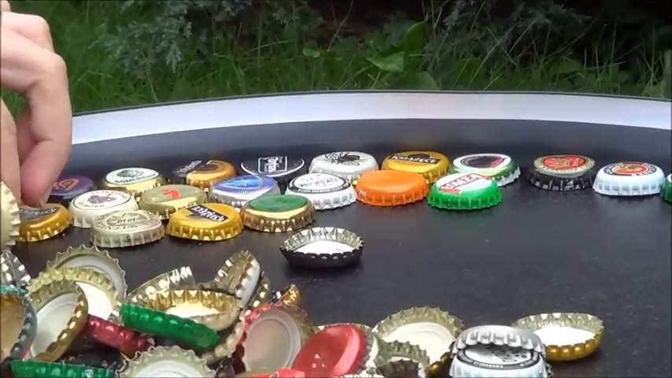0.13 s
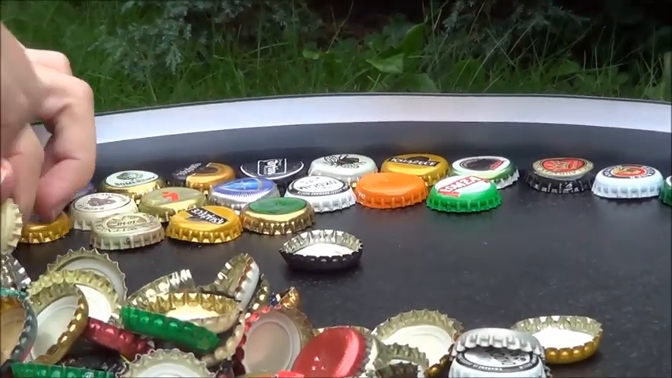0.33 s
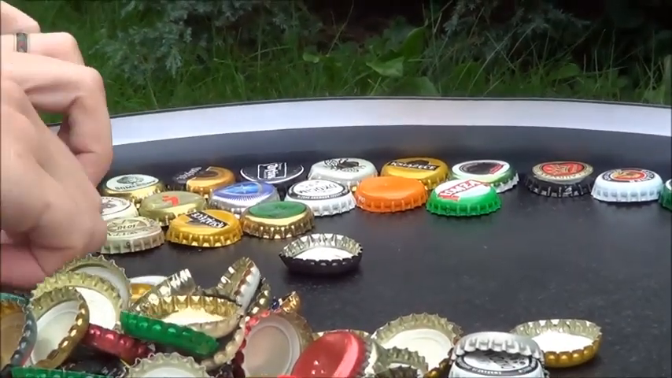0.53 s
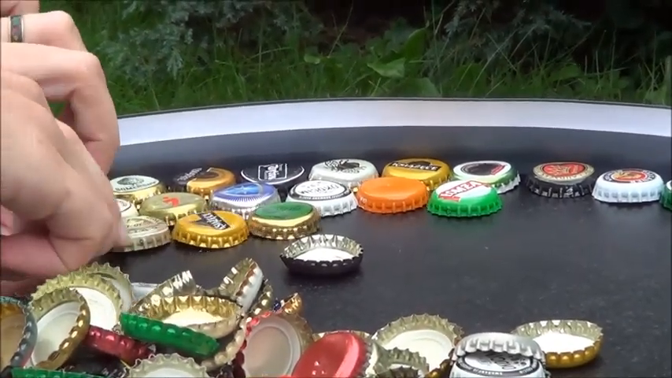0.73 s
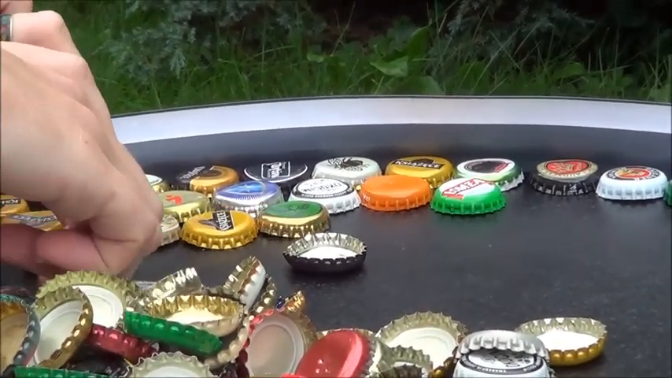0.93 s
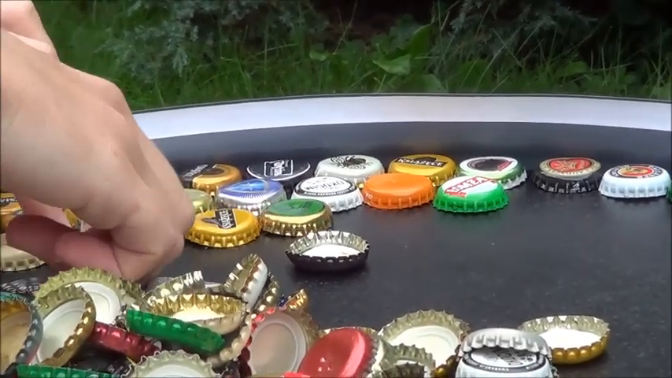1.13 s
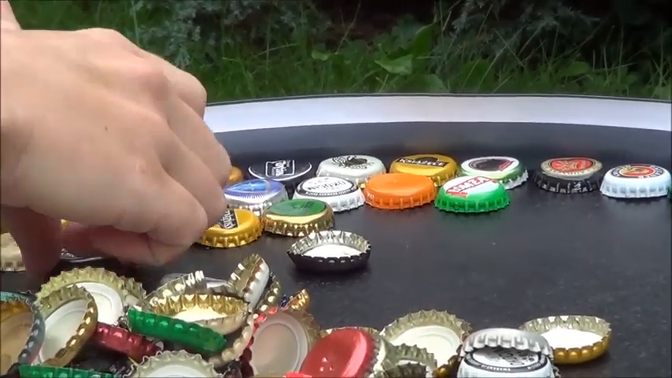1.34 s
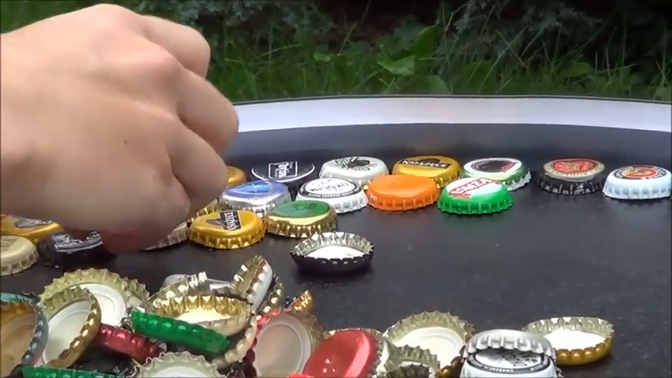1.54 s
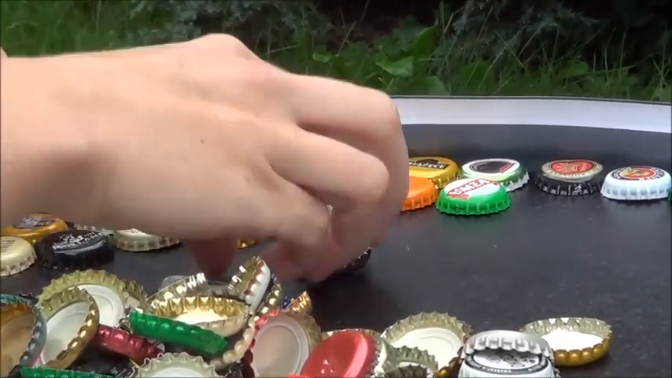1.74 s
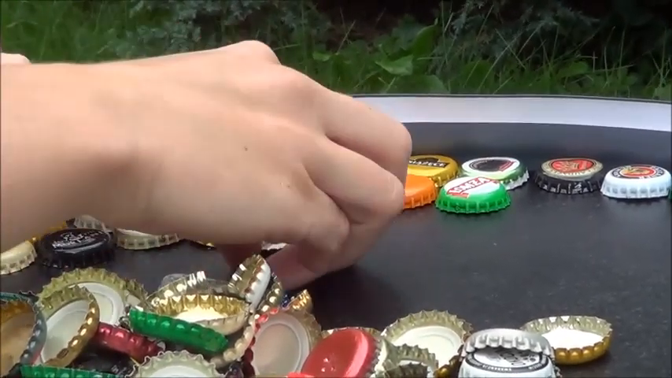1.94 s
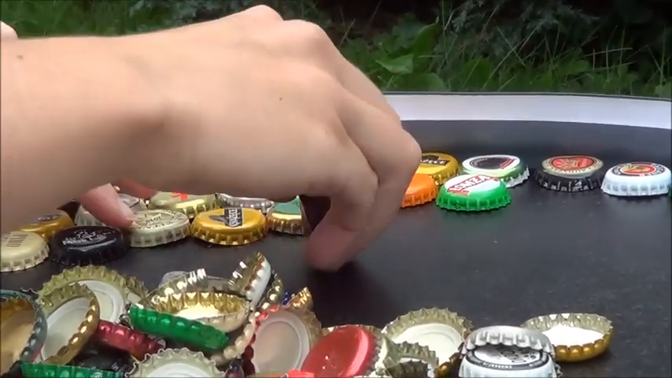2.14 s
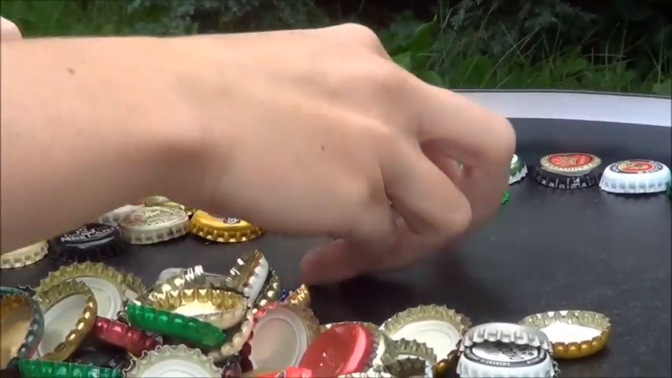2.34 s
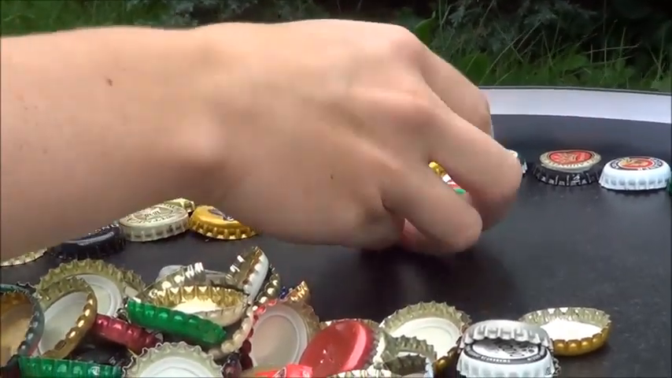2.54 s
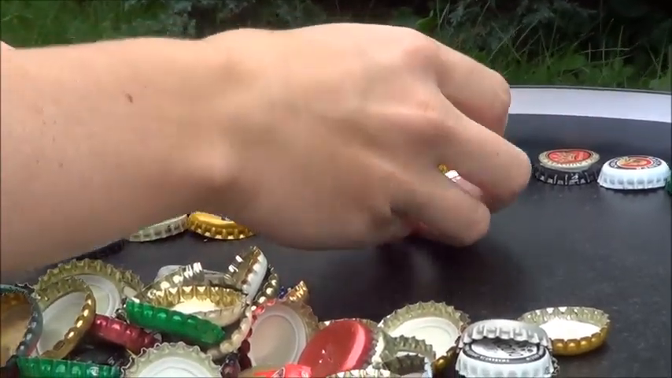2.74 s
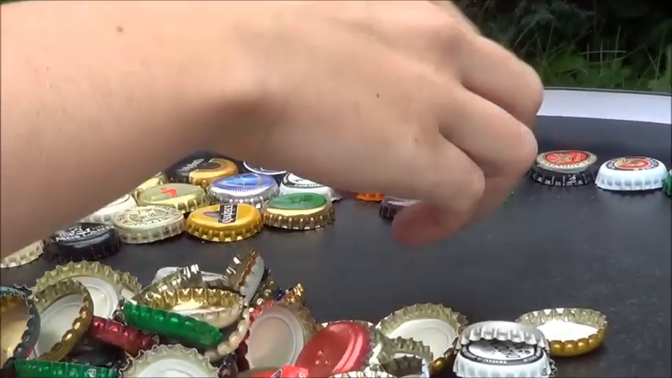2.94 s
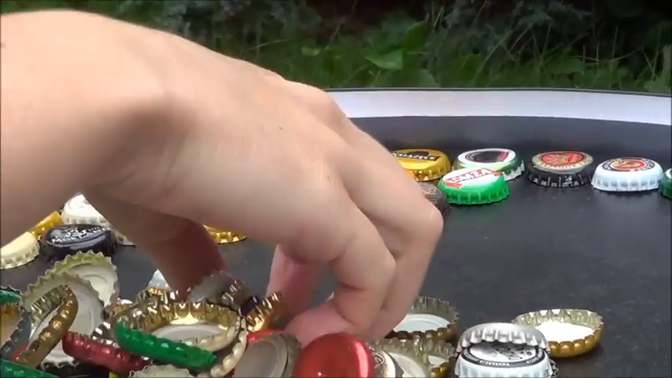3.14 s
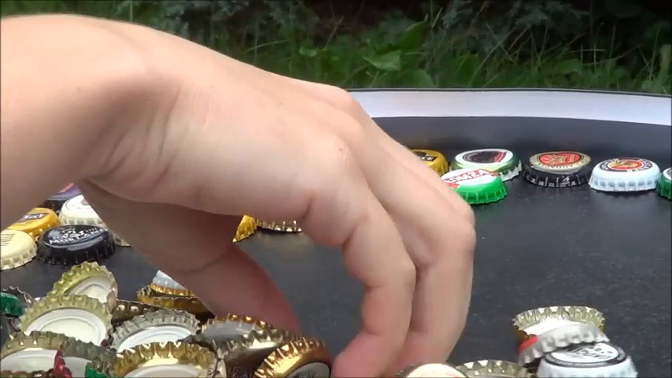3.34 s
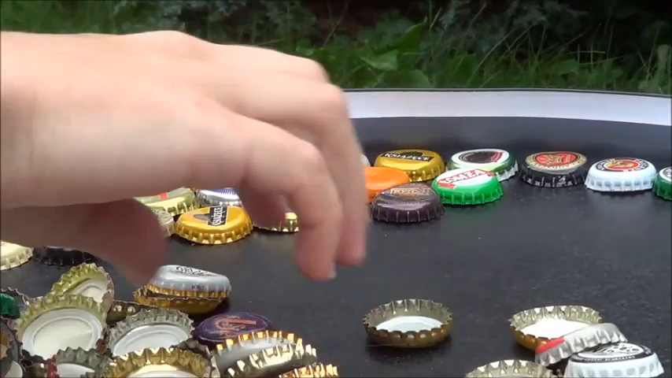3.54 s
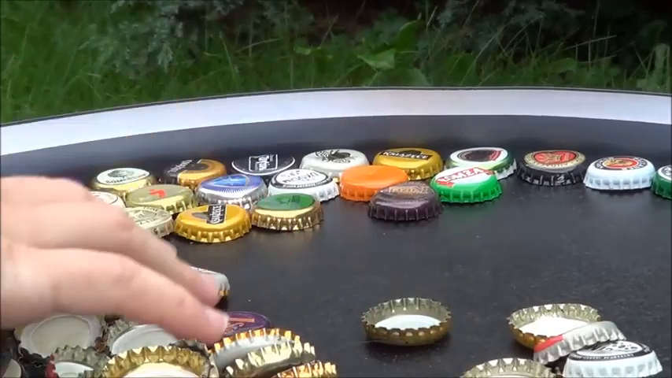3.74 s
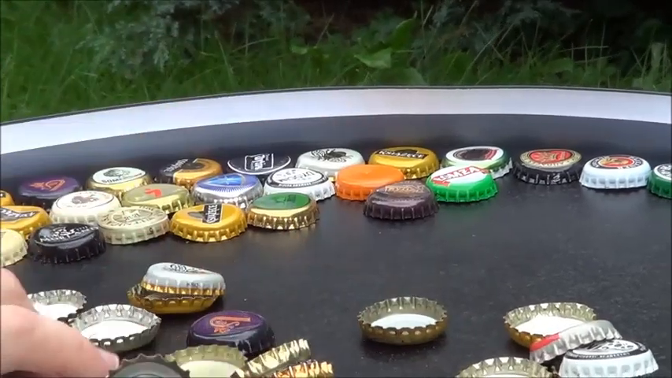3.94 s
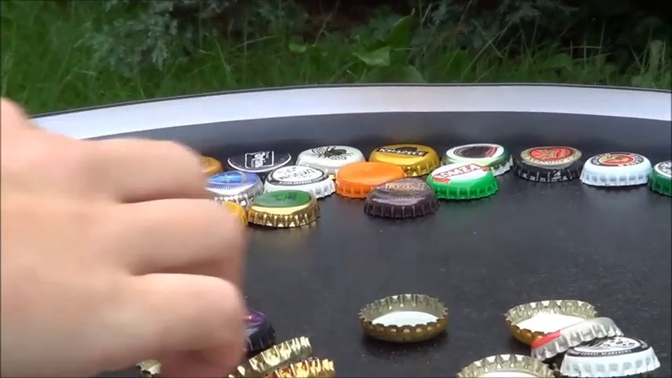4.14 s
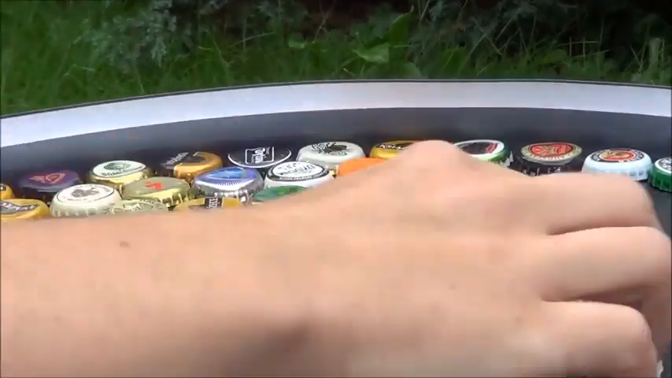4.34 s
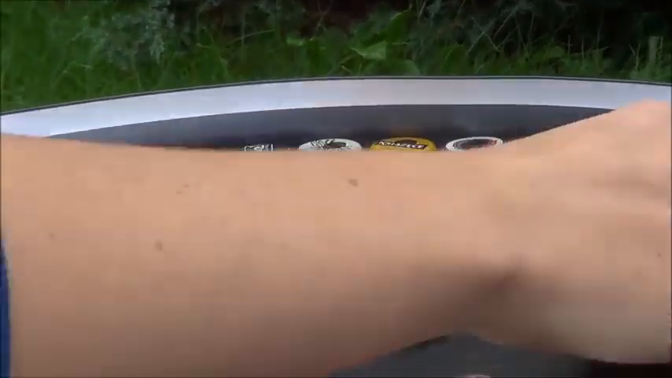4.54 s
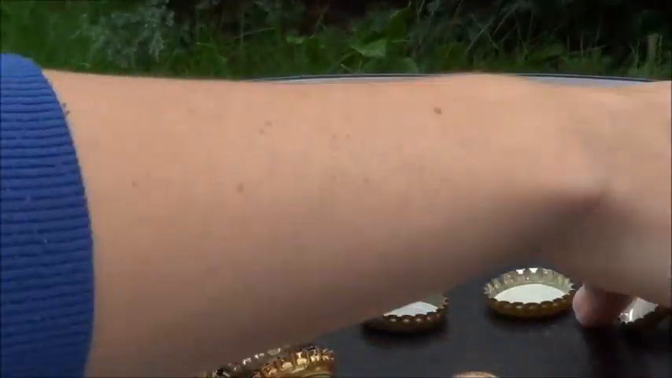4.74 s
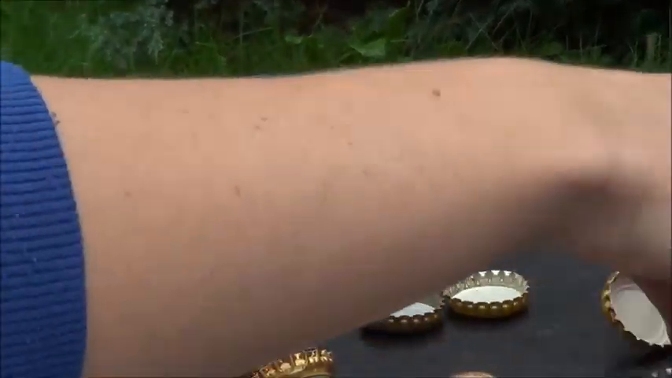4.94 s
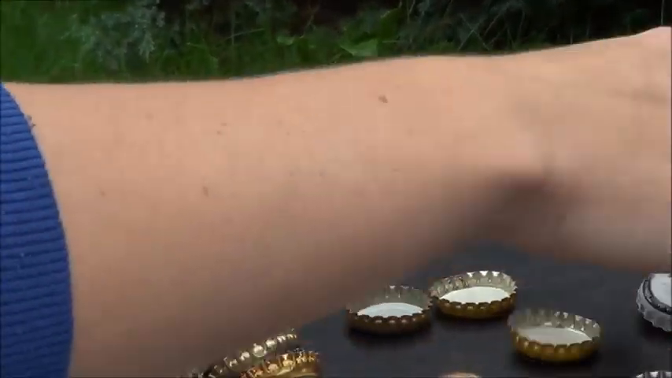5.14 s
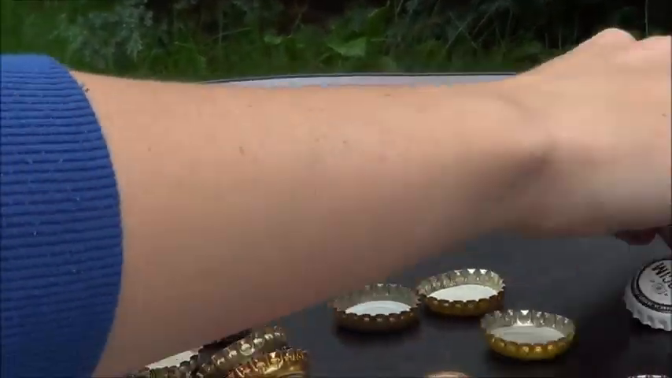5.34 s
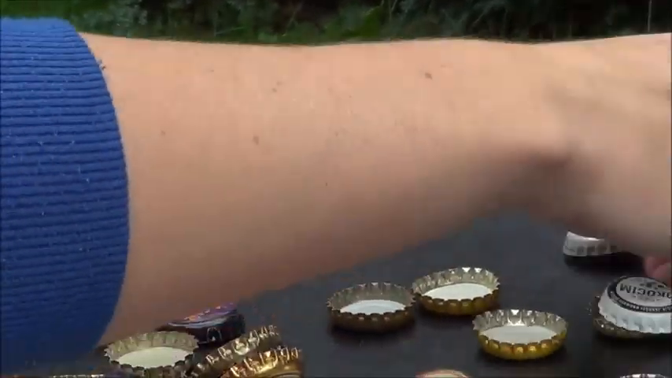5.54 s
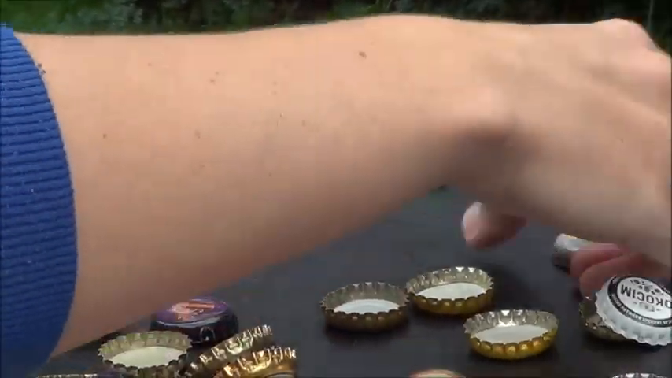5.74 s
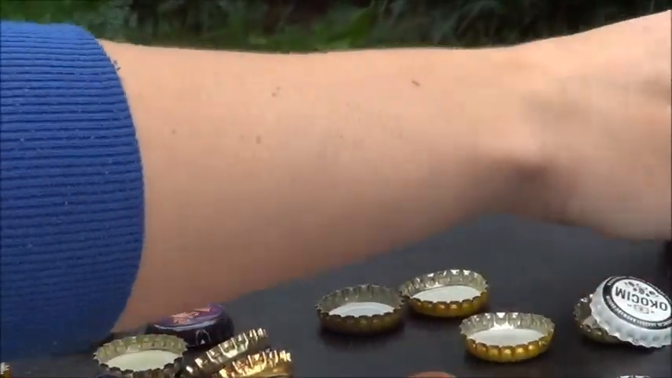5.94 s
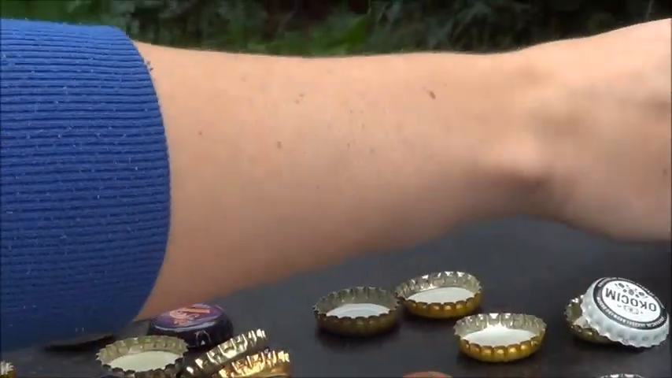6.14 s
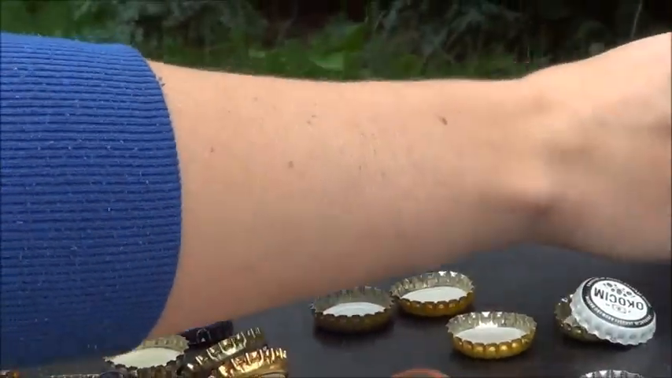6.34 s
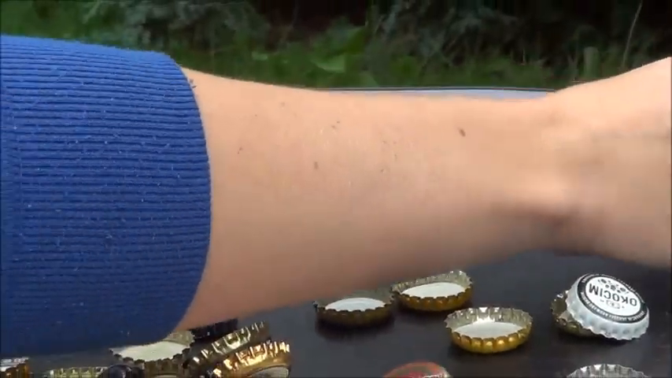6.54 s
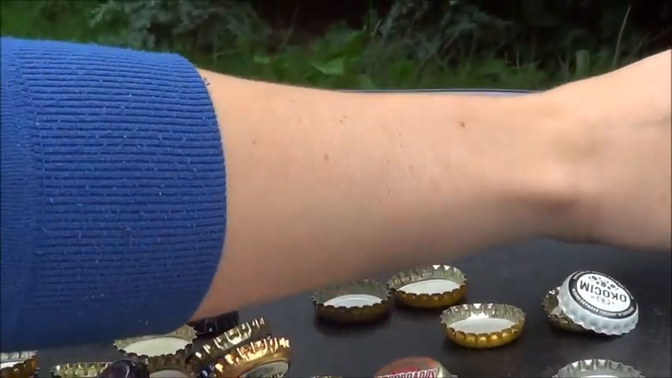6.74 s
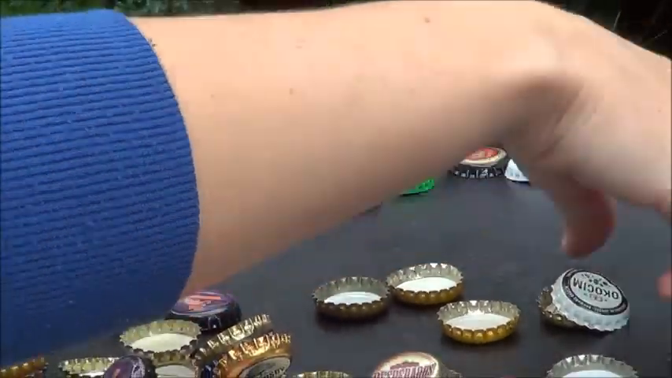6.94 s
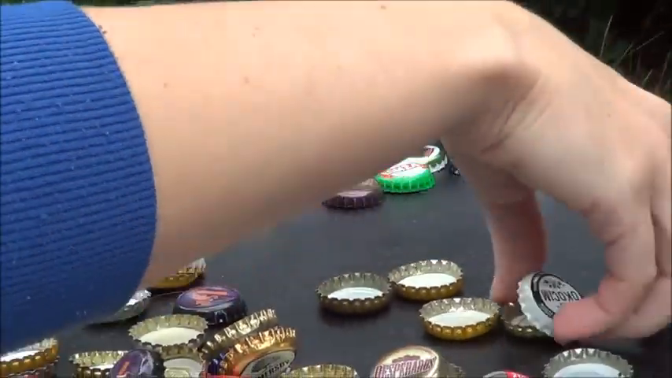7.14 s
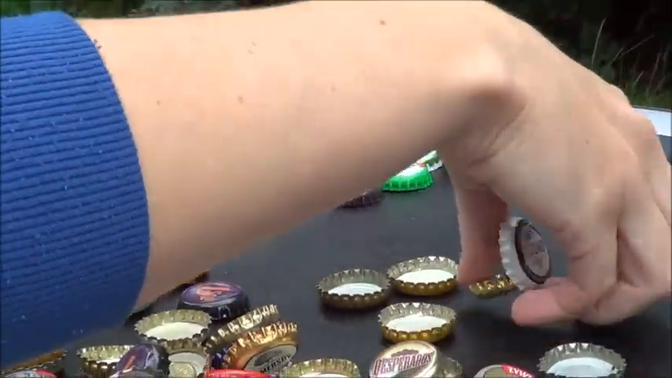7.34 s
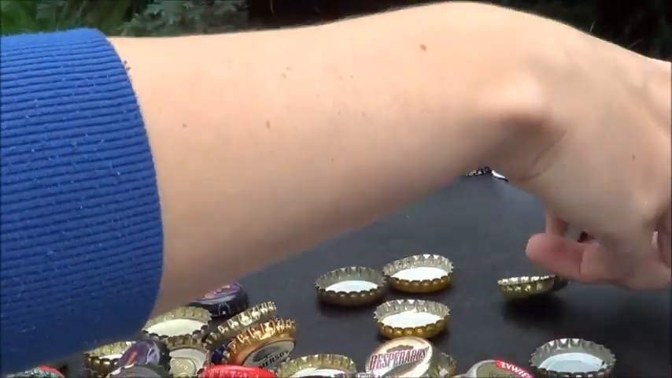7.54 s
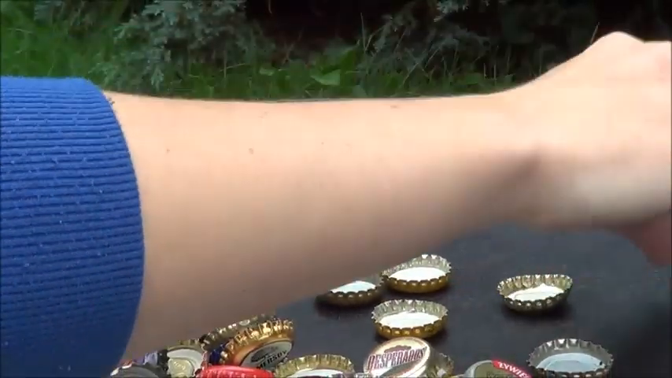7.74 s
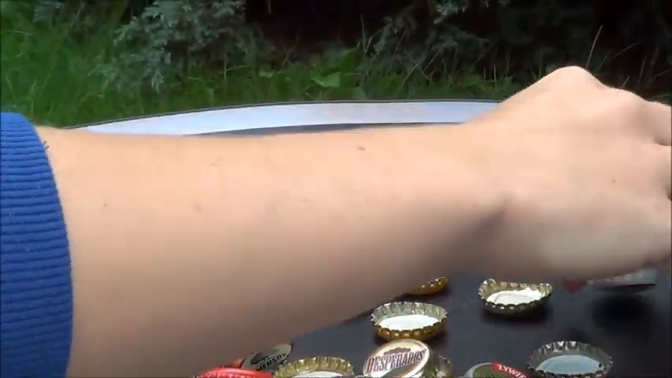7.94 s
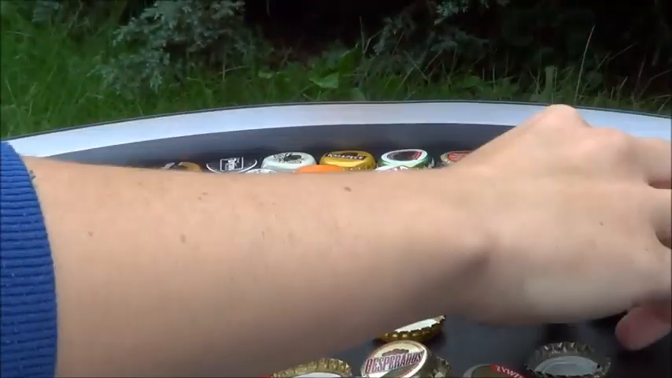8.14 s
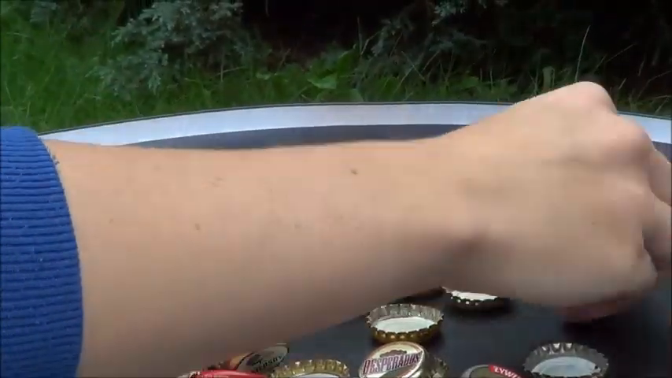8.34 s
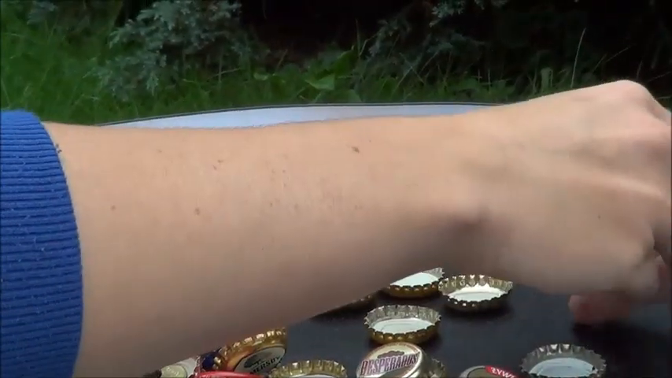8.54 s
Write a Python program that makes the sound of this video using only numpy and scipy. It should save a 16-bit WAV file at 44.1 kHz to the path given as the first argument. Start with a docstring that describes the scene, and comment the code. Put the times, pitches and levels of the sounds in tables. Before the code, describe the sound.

A hand sorts thin metal caps close to a stereo microphone in a garden. Single knocks and raspy, singing drags lead to two loud, crowded rattles through the heap, then sharper separate clacks and brief rings. In the second half the handling is softer and sparser, with low gusts thudding on the microphone over a soft airy hiss.

```python
"""Steel bottle caps clack, ring and rattle close by as a hand sorts them on a garden table.
Rakes through the pile set off crowds of knocks; single caps are struck as noise bursts with decaying modes.
Dragged caps rasp and sing through random slips. Behind them lies the filtered noise of a garden.
In the second half low, lumpy noise makes wind on the microphone; slow gain control ducks long rattles
and a limiter holds the peaks."""
import sys
import numpy as np
from scipy import signal
from scipy.fft import rfft, irfft, next_fast_len
from scipy.io import wavfile
from scipy.ndimage import uniform_filter1d, minimum_filter1d, map_coordinates

SR = 44100
rng = np.random.default_rng(int(sys.argv[2]) if len(sys.argv) > 2 else 0)


def dump(signal):
    """Clip the signal to [-1, 1] and save it as 16-bit WAV at the path in sys.argv[1]."""
    limited = np.clip(np.atleast_2d(signal).T, -1, 1)
    pcm = np.round(limited * 32767).astype(np.int16)
    wavfile.write(sys.argv[1], SR, pcm)


N = 383669
TIME = np.arange(N) / SR  # seconds

# Murmur of the garden. Each row: frequency in Hz, relative density in dB per Hz.
GARDEN_SPECTRUM = [(25, -11.5), (70, 0.5), (120, -3), (220, -7), (420, -9), (750, -5.5), (1600, -11.5),
                   (2300, -9), (4300, -14), (7000, -15.5), (9400, -13), (12000, -20), (16000, -27.5)]
# Wind rumble on the microphone. Each row: frequency in Hz, relative density in dB per Hz.
WIND_SPECTRUM = [(20, -16), (70, -3), (110, 2), (170, -2.5), (300, -12.5), (600, -25.5), (1500, -60)]
# Gusts on the microphone. Each row: peak time in seconds, width at half height in seconds, level in dB.
GUSTS = [(5.497, 0.11, -18), (6.085, 0.15, -21), (6.323, 0.057, -18), (6.488, 0.22, -21),
         (6.661, 0.059, -17), (6.897, 0.11, -24), (8.256, 0.019, -19), (8.51, 0.16, -20),
         (8.69, 0.061, -21)]
# Stereo spread of wind, as eddies hit the two ports differently. Each row: frequency in Hz, side-to-mid in dB.
WIND_WIDTH = [(50, -8), (130, -5.5), (260, 0)]
# Stereo spread of caps and garden. Each row: frequency in Hz, side gain in dB before each source's trim.
STEREO_WIDTH = [(40, -26), (250, -14.5), (600, -8.5), (2000, -12.5), (4500, -6.5), (13000, -18.5)]
# Fingers raking the pile. Each row: start in seconds, length in seconds, level in dB before trim.
RAKES = [(0.502, 0.089, -12), (0.644, 0.058, -17), (0.781, 0.036, -14), (0.867, 0.21, -25.5),
         (3.101, 0.38, -9.5), (3.542, 0.064, -12.5), (3.857, 0.32, -7), (4.243, 0.019, -12),
         (4.424, 0.059, -17)]
# Tone of the heap. Each row: frequency in Hz, relative density in dB per Hz.
PILE_SPECTRUM = [(400, -30), (700, -11.5), (1500, -12), (2100, -6), (4400, -5), (5400, 2), (6500, -9.5),
                 (9200, 2), (10800, -4.5), (13200, -4.5), (16000, -19.5)]
# Ringing modes, listed by cap. Each row: frequency in Hz, relative level in dB, undamped T60 in seconds.
CAP_MODES = { "edge": [(4140, 1, 0.078), (5040, 0.5, 0.035), (6260, 0, 0.1), (8670, 10.5, 0.046),
             (9630, 5.5, 0.058), (11320, 2.5, 0.05), (13100, 3.5, 0.03)], "pushed": [(3990, 0, 0.31),
             (4470, 3.5, 0.16), (6270, -11, 0.33), (8350, 0.5, 0.14), (8800, -5, 0.27), (11400, 2.5, 0.15),
             (12600, -6, 0.19)], "pinched": [(4850, -0.5, 0.15), (5400, 6, 0.082), (8860, 4.5, 0.13),
             (11900, 0, 0.11)], "bright": [(3940, -3.5, 0.081), (5010, -7.5, 0.069), (9780, 6, 0.057),
             (11160, -3, 0.14), (12900, -3, 0.086)], "flipped": [(2280, -4.5, 0.28), (5560, 12, 0.015),
             (6050, 9.5, 0.039), (7030, 6, 0.07), (10450, 0, 0.038)], "clear": [(4050, 11.5, 0.46),
             (4150, 3, 0.98), (6580, 4, 0.34), (7630, 9, 0.12), (10150, 7, 0.097)],
             "white": [(4490, 0.5, 0.075), (5905, 4.5, 0.11), (7010, -8, .2), (7980, 0, 0.13),
             (9320, -1, 0.13), (10030, -2.5, 0.12), (12550, 5, 0.057), (14350, -5, 0.099)],
             "gold": [(2110, -10.5, 0.089), (4490, -2, 0.065), (9200, -3, 0.18), (12200, 4.5, 0.15),
             (13400, -6, .15)], "flat": [(4070, -0.5, 0.23), (4460, 4, .16), (6550, -5, 0.13),
             (7550, 6.5, 0.047)], "tilted": [(4440, 0.5, 0.087), (7470, -4, 0.04), (12170, -0.5, 0.043)],
             "rocking": [(4910, 9, 0.043), (8400, 11, 0.054), (9350, 3.5, 0.29), (12450, 6, 0.16),
             (13300, -4, 0.25)], }
# The cap under the fingers. Each row: start in seconds, name of the cap.
CAP_IN_HAND = [(0, "edge"), (1.7, "pushed"), (2.77, "pinched"), (3.3, "bright"), (4.65, "flipped"),
               (5.05, "clear"), (5.45, "white"), (6.9, "tilted"), (7.28, "bright"), (7.42, "rocking"),
               (7.81, "gold"), (8.0, "flat"), (8.4, "gold")]
# Caps dragged or wobbling on the table. Each row: start in seconds, end in seconds, rasp level in dB,
# ring level in dB, centre of the rasp in Hz.
SLIDES = [(0.52, 1.12, -29.5, -48, 2220), (1.108, 1.193, -24.5, -69, 2580),
          (1.241, 1.583, -30, -35.5, 2840), (1.809, 1.942, -27.5, -46, 3200),
          (2.3, 2.447, -28.5, -28, 3050), (2.393, 2.79, -30.5, -30.5, 3460),
          (2.79, 2.858, -20, -20.5, 4100), (4.762, 5.067, -28, -32, 5720), (5.574, 5.748, -25, -24, 4400),
          (5.895, 5.999, -26, -21, 4170), (5.975, 6.129, -28, -24, 3940), (6.135, 6.18, -24, -22.5, 3840),
          (6.572, 6.77, -28.5, -57, 3460), (7.112, 7.192, -24, -23.5, 4400), (8.037, 8.101, -27, -32, 4300),
          (8.528, 8.613, -26, -30, 4270)]
# Tone of a rasp. Each row: multiple of its centre frequency, relative level in dB.
RASP_SPECTRUM = [(.1, -24.5), (.4, -8.5), (.72, -4), (1, 0.5), (1.3, -6.5), (2.4, -15.5), (4.5, -24)]
# Loose caps that ring out of the heap. Each row: start in seconds, frequency in Hz, level in dB before chance.
CLINKS = [(0.7072, 8900, -8), (0.8184, 4050, -10), (1.0634, 6440, -20), (3.1667, 5571, -15),
          (3.3744, 4970, -2), (3.551, 11010, 1), (4.2609, 9400, -6)]
# Caps striking the table or each other. Each row: time in seconds, clack level in dB before trim,
# ring level in dB before trim, brightness in dB per octave before limits.
HITS = [(0.123, -25.5, -62, -9), (0.3813, -20, -44.5, -8.5), (0.656, -8.5, -34, -7), (0.7879, -1, -22, -1),
        (0.8916, -11.5, -44, -7), (0.9196, -18, -33, -5), (0.936, -12, -41, -3), (0.9736, -13, -24, -3),
        (1.0474, -6, -21, -2), (1.189, -14, -53, 4), (1.2543, -4, -26, -3.5), (1.8572, -17, -42, -3),
        (1.8776, -15.5, -35, -4.5), (2.1743, -15.5, -36, -3), (2.3597, -6, -14.5, -2),
        (2.398, -7, -13.5, 9), (2.807, -14, -18, -3), (3.0825, 0, -15, -2), (3.551, -2, -9.5, 3),
        (3.6544, -10.5, -39, 9), (3.7452, 0.5, -17, 10), (4.261, 2.5, -17, -3.5), (4.435, -5, -36, 8),
        (4.457, -1.5, -36, 8.5), (4.51, -13, -35, -0.5), (4.54, -4.5, -48, 0), (4.735, -14.5, -23.5, 0.5),
        (4.7701, -16, -25, -3), (4.829, -5.5, -25, 3), (4.9075, -7, -30, 1.5), (5.0105, -10, -37, -0.5),
        (5.0841, -1, -20, 2.5), (5.1735, -13.5, -35, 0.5), (5.249, -16.5, -31.5, -2.5),
        (5.3214, -21.5, -43, -3), (5.363, -23, -42, -1), (5.441, -26.5, -60, -9), (5.585, -12, -31, -5.5),
        (5.5977, -11, -21, 0), (5.646, -8, -29, -0.5), (5.662, -15, -29, -5), (5.6944, -10, -32, -2),
        (7.102, -15, -28, 2.5), (7.1195, -11, -39, 1), (7.169, -9, -36, 0), (7.333, -11.5, -38, 9),
        (7.5221, -9.5, -19, -2), (7.5772, -15, -43, -1), (7.605, -16, -46, 1), (7.612, -14, -39, 4),
        (7.6335, -14.5, -44, 9), (7.692, -15, -42, -0.5), (7.7292, -9.5, -44, 0), (7.871, -14.5, -24, -10),
        (7.969, -17, -25, -5.5), (8.0198, -15, -23, 1), (8.047, -13, -26, -0.5), (8.1679, -17, -31, -2.5),
        (8.261, -19.5, -46, -3), (8.459, -16.5, -40, -6), (8.5345, -8.5, -25, -3)]
# Contact tone of a struck cap, before brightness. Each row: frequency in Hz, relative level in dB.
CLACK_SPECTRUM = [(250, -20.5), (900, -6.5), (1600, -1.5), (2200, 2.5), (3400, 2.5), (5500, -0.5),
                  (9000, -2.5), (12500, -12), (16000, -27)]

GARDEN_DB = -30.5
# the breeze under the gusts springs up and slowly dies away
BREEZE_START_S, BREEZE_RISE_S, BREEZE_DB, BREEZE_FADE_DB_PER_S = 5.27, 0.058, -30, 4.5
# a rake takes hold quickly; when it stops, the heap settles
GRAB_S, SETTLE_DB_PER_S = 0.011, 144
# after a blow the rim chatters: rebounds tend to come sooner, and each is weaker
REBOUND_S, REBOUND_SHRINK, REBOUND_DB, REBOUND_LOSS_DB = 0.013, 0.81, -17, 0.5
CUTOFF_HZ = 15900


def amp(db):
    """Decibels to gain."""
    return 10 ** (np.asarray(db) / 20)


def rms(x):
    """Root mean square, kept above zero."""
    return np.sqrt(np.mean(x ** 2) + 1e-20)


def read(points, hz):
    """A spectrum read in dB on a log-frequency axis."""
    point_hz, db = np.transpose(points)
    return np.interp(np.log(hz + 1), np.log(point_hz + 1), db)


def colour(x, points, tilt_db=0):
    """Causal minimum-phase filter with the given spectrum and a tilt in dB per octave above 1 kHz."""
    size = next_fast_len(len(x) + 2048, real=True) * 2
    hz = np.fft.rfftfreq(size, 1 / SR)
    octaves = np.log2(np.maximum(hz, 1000) / 1000)
    log_gain = np.log(amp(read(points, hz) + tilt_db * octaves))
    # folding the cepstrum to positive times makes the filter causal
    fold = np.r_[1, np.full(size // 2 - 1, 2)]
    cepstrum = irfft(log_gain)[:size // 2] * fold
    response = np.exp(rfft(cepstrum, size))
    return irfft(rfft(x, size) * response)[:len(x)]


def wander(count, per_s):
    """Slow drift: straight lines between random values of unit spread."""
    at = np.arange(count) * per_s / SR
    return np.interp(at, np.arange(4096), rng.standard_normal(4096))


def add(mix, s, sound):
    """Mixes a sound in at time s."""
    part = mix[max(round(s * SR), 0):][:len(sound)]
    part += sound[:len(part)]


def garden():
    """Steady, distant outdoor murmur and hiss from filtered noise."""
    air = colour(rng.standard_normal(N), GARDEN_SPECTRUM)
    return amp(GARDEN_DB) * air / rms(air)


def wind_strength():
    """A fading breeze, with gusts on top that swell and die as bell curves."""
    since = np.maximum(TIME - BREEZE_START_S, 0)
    rise = np.minimum(since / BREEZE_RISE_S, 1)
    breeze = rise * amp(BREEZE_DB - BREEZE_FADE_DB_PER_S * since)
    gusts = [amp(db) * .5 ** np.minimum((2 * (TIME - peak) / length) ** 2, 20)
             for peak, length, db in GUSTS]
    return np.sqrt(breeze ** 2 + np.sum(np.square(gusts), axis=0))


def wind(strength, lumpy_db=2):
    """Eddies buffet the microphone: low noise, made lumpy by a quick random level."""
    rumble = colour(rng.standard_normal(N), WIND_SPECTRUM)
    eddies = rumble * amp(lumpy_db * wander(N, per_s=45))
    return eddies / rms(eddies) * strength


def surroundings(x, fall_s, size=8000):
    """Scatter from the table, the arm and the garden: a fading noise echo of unit energy."""
    t = np.arange(size) / SR
    echo = rng.standard_normal(size) * np.exp(-t / fall_s)
    return signal.oaconvolve(x, echo / np.linalg.norm(echo))[:N]


def cap_at(s):
    """Modes of the cap in hand at time s."""
    names = [name for start, name in CAP_IN_HAND if start <= max(s, 0)]
    return CAP_MODES[names[-1]]


def ring(modes, pitch=1, damping=1, size=22050):
    """A cap's free ring as decaying sines; the spot that is struck sets each mode's random share."""
    hz, db, t60 = np.transpose(modes)[:, :, None]
    t = np.arange(size) / SR
    share_db, phase = 2 * rng.standard_normal(hz.shape), rng.random(hz.shape)
    decay = np.exp(-np.log(1000) * t * damping / t60)
    tone = np.sin(2 * np.pi * (hz * pitch * t + phase))
    return (amp(db + share_db) * decay * tone).sum(0)


def clack(fall_s, shudder, size=2600):
    """Contact of the crimped rim: a dense crack, then the short shudder of what it lands on."""
    t = np.arange(size) / SR
    envelope = np.exp(-t / fall_s) + shudder * np.exp(-t / .008)
    return rng.standard_normal(size) * envelope


def stirring():
    """How hard the pile is moved: each rake grabs, holds, and leaves the heap to settle."""
    rakes = []
    for start, length, db in RAKES:
        grab = np.clip((TIME - start) / GRAB_S, 0, 1)
        after = np.maximum(TIME - start - length, 0)
        rakes.append(grab * amp(db - SETTLE_DB_PER_S * after))
    return np.max(rakes, axis=0)


def pile(pile_db=-1, detune=0.09, count=90):
    """Dozens of caps, all a little different and damped by their neighbours; harder stirring, more knocks."""
    knocks_per_s, spread_db, damping = 900, 4.4, 1.7  # mean rate is for the hardest stirring
    # in the heap the lowest, flexing modes of a cap are choked
    kinds = [[mode for mode in modes if mode[0] > 4600] for modes in CAP_MODES.values()]
    out = np.zeros(N)
    stir = stirring()
    busy = np.sqrt(stir / stir.max())
    for k in range(count):
        pitch = 1 + detune * rng.uniform(-1, 1)
        tone = ring(kinds[k % len(kinds)], pitch, damping, size=8000)
        crack = clack(fall_s=.001, shudder=.15)
        knock = 2.2 * tone / np.linalg.norm(tone)
        add(knock, 0, crack / np.linalg.norm(crack))
        wait, size = rng.exponential(1, (2, 200))
        times = np.cumsum(wait) * count / knocks_per_s
        moved = rng.random(len(times)) < np.interp(times, TIME, busy)
        for s, big in zip(times[moved], np.minimum(size, 3.8)[moved]):
            add(out, s, amp(spread_db * big) * knock)
    # the knocks' own spectrum is flattened, then the heap shapes the tone
    hz, power = signal.welch(out, SR, nperseg=64)
    flat = colour(out, np.c_[hz[1:-1], -10 * np.log10(power[1:-1])])
    out = colour(flat, PILE_SPECTRUM)
    # the hand's pressure sets the level, so the local level is evened out first
    local = abs(uniform_filter1d(out ** 2, size=1000))
    return amp(pile_db) * stir * out / np.sqrt(local + .003 * local.mean())


def clinks(t60=0.1):
    """A loose cap knocked on its rim sings in one mode."""
    out = np.zeros(N)
    for s, hz, db in CLINKS:
        add(out, s, amp(db) * ring([(hz, 0, t60)]))
    return out


def slides(slips_per_s=700, spread_db=3.8, detune=0.0092, damping=1.3, waver=0.0041, count=6):
    """The teeth of a dragged cap catch and slip; each tooth loads the modes a little differently."""
    out = np.zeros(N)
    draw, sizes = rng.random((count, N)), rng.exponential(1, (count, N))
    grit = rng.standard_normal((count, N))
    slips = (draw < slips_per_s / count / SR) * amp(spread_db * np.minimum(sizes, 3))
    pressure = amp(1.6 * wander(N, per_s=110))
    bend = waver * wander(N, per_s=39.9)
    # over a steady scrape, every slip lets go a millisecond of grit
    bursts = signal.lfilter([1], [1, -np.exp(-1000 / SR)], slips.sum(0))
    scrape = grit[0] * (.4 + bursts)
    loads = 1 + detune * np.linspace(-1, 1, count)
    for start, end, rasp_db, ring_db, centre_hz in SLIDES:
        length = max(int((end - start) * SR), 256)
        span = slice(int(start * SR), int(start * SR) + length)
        stroke = pressure[span] * signal.windows.tukey(length, .4)
        spectrum = [(ratio * centre_hz, db) for ratio, db in RASP_SPECTRUM]
        rasp = colour(stroke * scrape[span], spectrum)
        drives = stroke * (slips[:, span] + .02 * grit[:, span])
        modes = cap_at((start + end) / 2)
        tone = sum(signal.fftconvolve(drive, ring(modes, load, damping))
                   for drive, load in zip(drives, loads))
        # changing load bends the pitch
        tone = map_coordinates(tone, [np.cumsum(1 + bend[:len(tone)])], order=5)
        add(out, start, amp(rasp_db) * rasp / rms(rasp))
        add(out, start, amp(ring_db) * tone / rms(tone[:length]))
    return out


def rebounds(s, count=3):
    """Times of the small bounces after a blow at time s, and their dB against the blow."""
    k = np.arange(count)
    gaps = REBOUND_S * REBOUND_SHRINK ** k * (.5 + rng.random(count))
    return zip(s + np.cumsum(gaps), REBOUND_DB - REBOUND_LOSS_DB * k)


def single_caps(clack_db=-2, ring_db=1, ping_db=1, ping_t60=0.016, crack_s=0.0023, shudder=0.41, tick_s=0.0006):
    """Each blow is a clack, a ping choked by the contact, the free ring of the cap in hand, and rebounds."""
    out = np.zeros(N)
    attack, sustain = slice(0, 132), slice(220, 880)  # samples where the level is set
    for s, hit_db, rung_db, tilt_db in HITS:
        tilt_db = np.clip(tilt_db, -7, 9)
        modes = [(hz, db + .3 * tilt_db * np.log2(hz), t60) for hz, db, t60 in cap_at(s)]
        crack = colour(clack(crack_s, shudder), CLACK_SPECTRUM, tilt_db)
        choked = [(hz, db, ping_t60) for hz, db, _ in modes]
        ping = colour(ring(choked, size=2600), CLACK_SPECTRUM, tilt_db)
        # a cap held by the fingers rings weaker and also shorter
        tone = ring(modes, damping=1 + .05 * max(hit_db - rung_db - 15, 0))
        contact = crack / rms(crack[attack]) + amp(ping_db) * ping / rms(ping[attack])
        add(out, s, amp(hit_db + clack_db) * contact)
        add(out, s, amp(rung_db + ring_db) * tone / rms(tone[sustain]))
        for later_s, softer_db in rebounds(s):
            tick = colour(clack(tick_s, shudder), CLACK_SPECTRUM, tilt_db)
            add(out, later_s, amp(hit_db + clack_db + softer_db) * tick / rms(tick[attack]))
    return out


def scene(echo_db=-18, step_db=-5, scatter_db=-5, air_side_db=2):
    """Close caps near the centre, in wider air."""
    caps = single_caps() + clinks() + slides() + pile()
    strength = wind_strength()
    echo = amp(echo_db) * surroundings(caps, fall_s=.028)
    mid = caps + echo + garden() + wind(strength)
    # the two ports hear close sounds at one level but out of step (a quarter turn in the side),
    # each with its own scatter
    out_of_step = 1j * amp(step_db) * rfft(caps)
    apart = out_of_step + amp(scatter_db) * rfft(surroundings(caps, fall_s=.006))
    side = apart + amp(air_side_db) * rfft(garden())
    width = amp(read(STEREO_WIDTH, np.fft.rfftfreq(N, 1 / SR)))
    side = irfft(side * width, N) + colour(wind(strength), WIND_WIDTH)
    return np.array([mid + side, mid - side])


def gain_control(x, knee_db=-23, share=0.5, sense_s=0.46, recover_db_per_s=5):
    """Long, loud rattling turns the whole scene down; the gain creeps back afterwards."""
    keep = np.exp(-1 / (sense_s * SR))
    heard = signal.lfilter([1 - keep], [1, -keep], abs(x).mean(0))
    heard_db = 20 * np.log10(heard + 1e-9)
    cut_db = share * np.maximum(heard_db - knee_db, 0)
    fall = TIME * recover_db_per_s
    # a running maximum against the falling line holds the cut and releases it at a steady rate
    return x * amp(fall - np.maximum.accumulate(cut_db + fall))


def record(dry):
    """Slow gain control, a fast peak limiter, then the band limit."""
    dry = gain_control(dry)
    ceiling_db, recover_db_per_s = -1.8, 1500
    over_db = np.maximum(20 * np.log10(abs(dry).max(0) + 1e-9) - ceiling_db, 0)
    fall = TIME * recover_db_per_s
    held_db = np.maximum.accumulate(over_db + fall) - fall
    # the gain dips just ahead of each peak, with rounded corners
    gain = uniform_filter1d(minimum_filter1d(amp(-held_db), size=17), size=17)
    low_pass = signal.firwin(401, CUTOFF_HZ, window=("kaiser", 9), fs=SR)
    return signal.oaconvolve(dry * gain, low_pass[None], "same")


dry = scene()
out = record(dry)
dump(out)
```